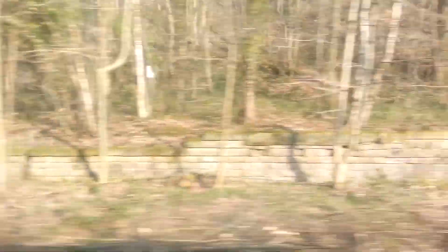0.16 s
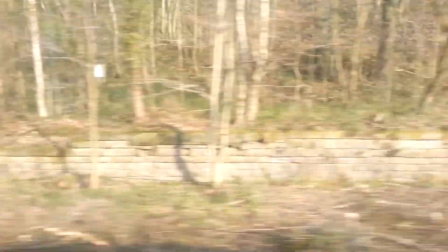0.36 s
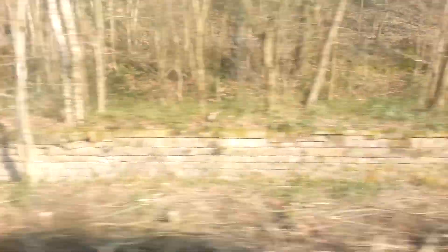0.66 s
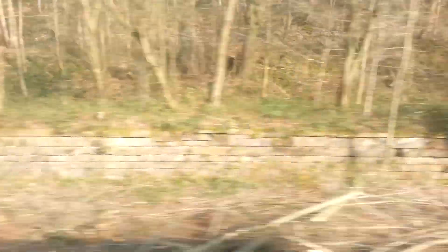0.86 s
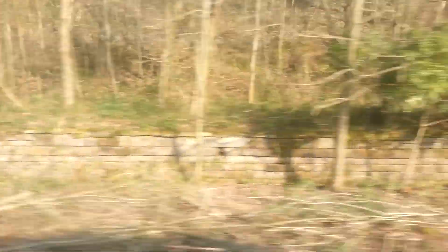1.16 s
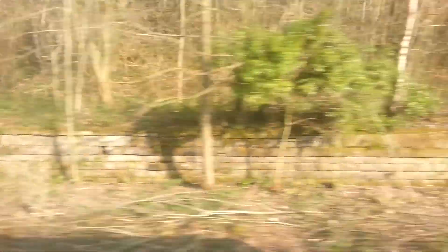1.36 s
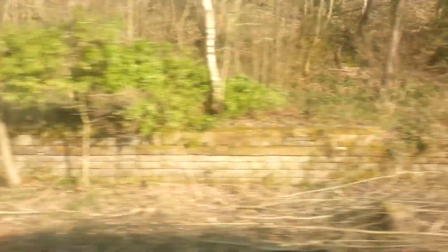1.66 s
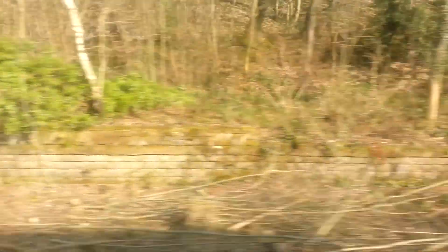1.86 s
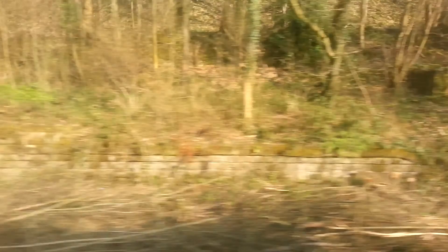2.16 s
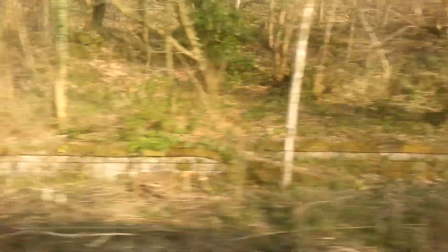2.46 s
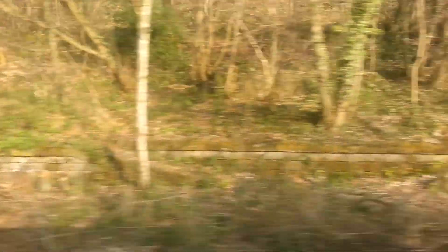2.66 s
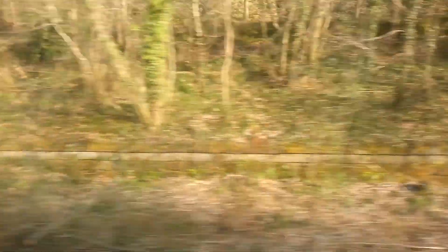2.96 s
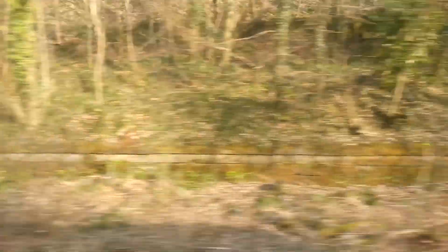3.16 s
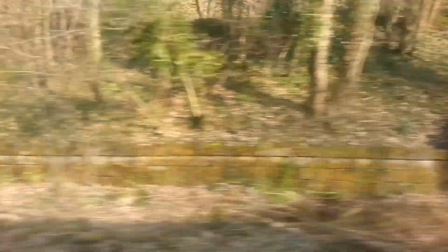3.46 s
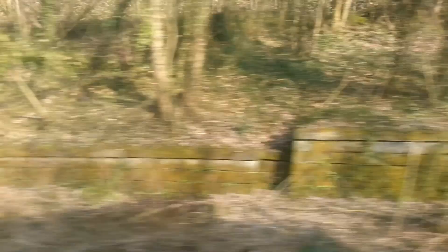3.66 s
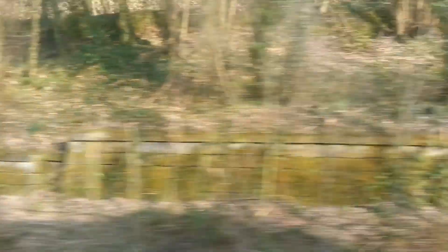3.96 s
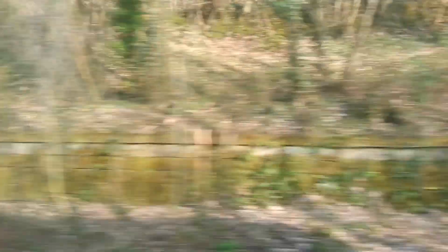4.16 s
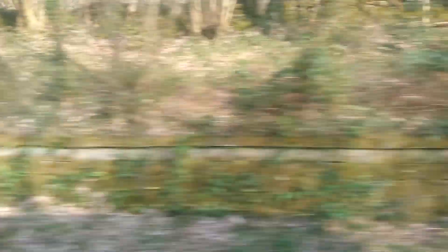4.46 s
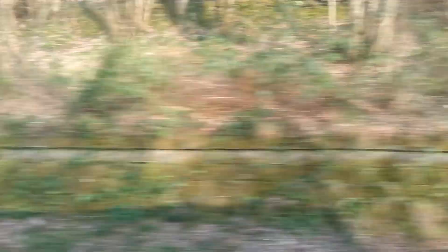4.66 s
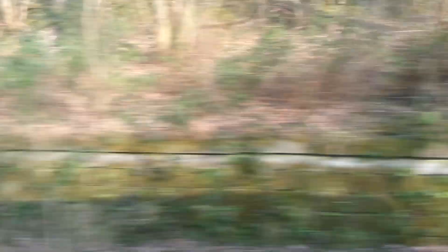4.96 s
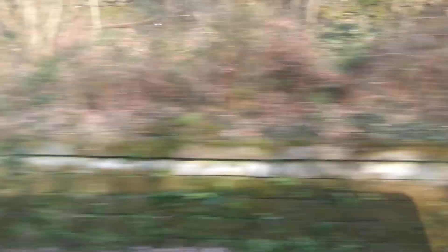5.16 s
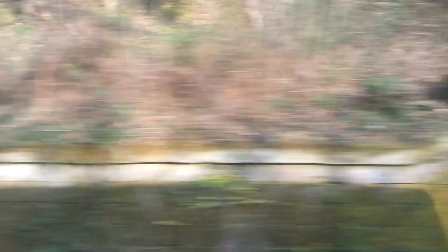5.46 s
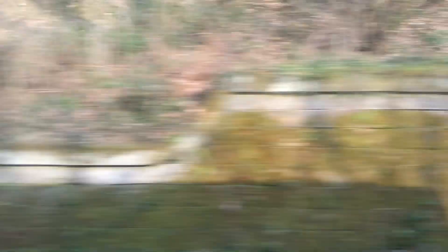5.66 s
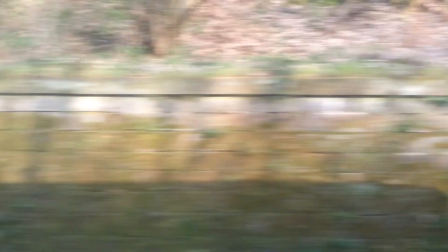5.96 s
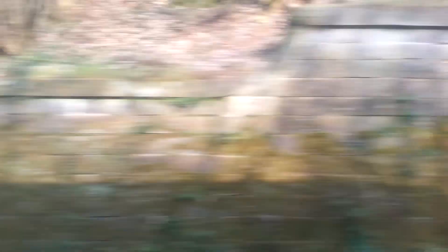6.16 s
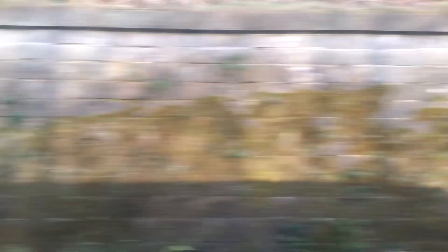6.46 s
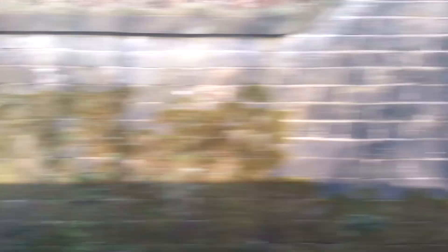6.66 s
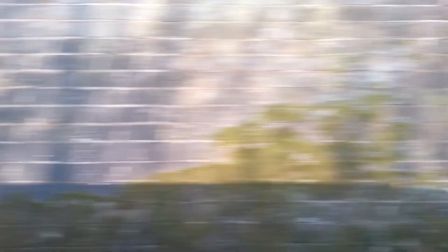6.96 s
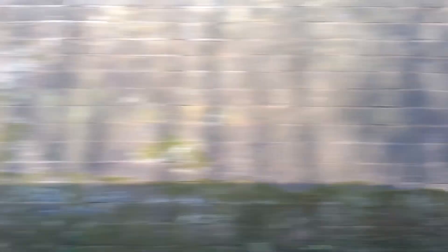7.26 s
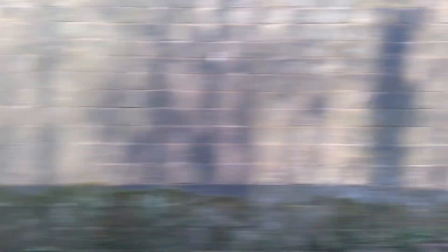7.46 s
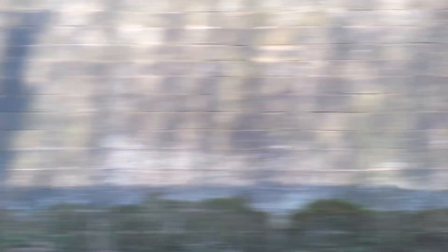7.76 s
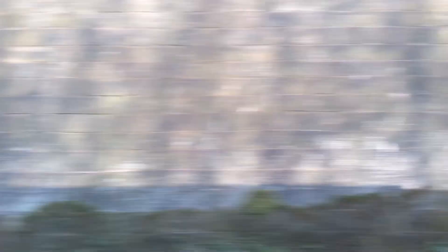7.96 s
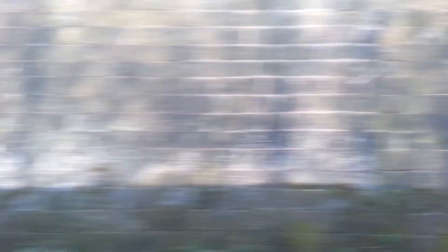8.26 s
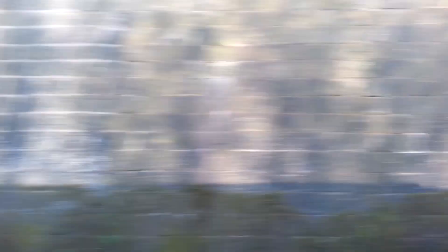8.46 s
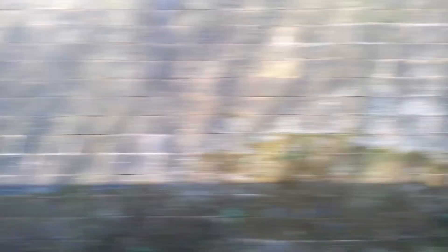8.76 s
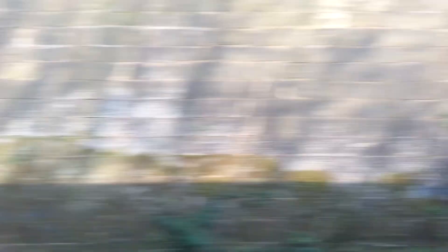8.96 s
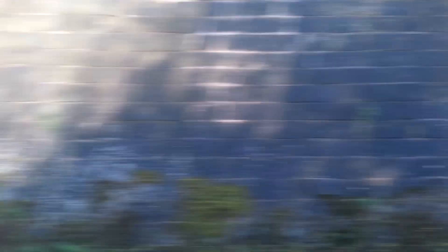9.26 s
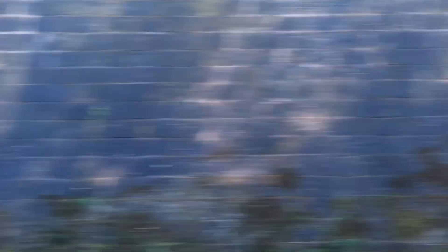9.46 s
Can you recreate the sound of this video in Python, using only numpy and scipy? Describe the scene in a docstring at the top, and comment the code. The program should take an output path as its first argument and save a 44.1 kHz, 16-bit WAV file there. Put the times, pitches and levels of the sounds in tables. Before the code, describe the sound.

Heard from a window seat inside a speeding diesel passenger carriage, an unbroken wheel roar fills the whole ten seconds, dull and mid-heavy, with low boom, airy rush and uneven judder. A heavy clack lands at the very start. Soft bumps and short panel drumming follow, and a sharp dry tick snaps on the right at 1.2 seconds. Double clacks, about 0.15 seconds apart, hit at 2.0, 4.1 and 6.3, then faster at 7.4 and 8.5, with a last single knock at 9.5. Each has a steel crack, floor thud and brief ringing; the loudest distort slightly. Hissing swells follow the joints and also rise around 0.8, 2.9 and 5.1. Thin, high flange squeals with scraping appear near 4.4 to 4.8, faintly at 6.5, then more often from 7.5 to 9.3. Around 8.5 the panels drum most strongly, with a hollow boom. The roar continues to the end.

```python
"""Wheels roar on steel rails, heard at the window seat inside a diesel passenger train.
Coloured noise, filtered by the carriage body, rumbles and hisses louder over worn rail and in dips.
Two axles of a bogie clack over each joint, the loudest overloading the microphones: bursts of noise and ringing modes.
Panels drum and wheels and rails sing as roughened tones; brief dull noise bursts make chance lumps in the roar.
A fitting ticks as short damped cycles on the right; a rubbing flange squeals as gliding tones with scrape."""
import sys
import numpy as np
from scipy import signal
from scipy.fft import rfft, irfft, next_fast_len
from scipy.io import wavfile

SR = 44100
rng = np.random.default_rng(int(sys.argv[2]) if len(sys.argv) > 2 else 0)


def to_wav(s):
    """Save 16-bit WAV."""
    ch = np.atleast_2d(s).T  # columns
    pcm = np.round(np.clip(ch, -1, 1) * 32767)  # PCM
    wavfile.write(sys.argv[1], SR, pcm.astype(np.int16))


N = 424241


def amp(db):
    """Decibels to gain."""
    return 10 ** (np.asarray(db) / 20)


def evened(x):
    """Scales to rms 1."""
    return x / np.sqrt(np.mean(x ** 2) + 1e-20)


def read(points, hz):
    """Reads a table along a log-frequency axis."""
    f, value = np.transpose(points)
    return np.interp(np.log(hz + 1), np.log(f + 1), value)


def follow(rows, axis):
    """One column of a time curve, sample by sample."""
    rows = np.array(rows)
    return np.interp(np.arange(N) / SR, rows[:, 0], rows[:, axis])


def add(mix, s, sound):
    """Adds a stereo sound at a time in seconds, trimmed to fit the mix."""
    start = round(s * SR)
    sound = sound[:, max(-start, 0):]
    part = mix[:, max(start, 0):][:, :sound.shape[1]]
    part += sound[:, :part.shape[1]]


def wander(hz, size):
    """Slow random curve, rms 1 over the whole scene, moving up to about hz."""
    f = np.fft.rfftfreq(N, 1 / SR)
    noise = rfft(rng.standard_normal(N))
    return evened(irfft(noise / (1 + (f / hz) ** 4), N))[:size]


def fuzz(width, size):
    """Stereo complex noise of rms 1 that spreads a tone over width Hz."""
    # the extra half second lets the filter settle
    a, b = rng.standard_normal((2, 2, size + SR // 2))
    lowpass = signal.butter(2, width / 2, fs=SR, output="sos")
    z = signal.sosfilt(lowpass, a + 1j * b)[:, -size:]
    return z / np.sqrt(np.mean(abs(z) ** 2))


def jitter(hz, size):
    """Quick random curve of rms 1, moving up to about hz, for one short sound."""
    return evened(fuzz(2 * hz, size=size)[0].real)


SKIRT_DB_PER_OCTAVE = 15


def colour_db(spectrum, hz):
    """Reads a spectrum, falling away beyond its ends."""
    inside = np.clip(hz, spectrum[0][0], spectrum[-1][0])
    octaves_out = abs(np.log2((hz + 1) / (inside + 1)))
    return read(spectrum, hz) - SKIRT_DB_PER_OCTAVE * octaves_out


# level difference of the two microphones: [f/Hz, left minus right/dB]
MIC_BALANCE = [(40, -3.5), (120, -1.5), (300, -1.7), (440, -2.3), (620, 0), (850, .5), (1200, -2.8),
               (1700, 0), (3300, 1), (8000, -1)]
# phase difference of the two microphones: [f/Hz, left lead/rad]
MIC_LEAD = [(20, 0), (300, .05), (430, .2), (690, .6), (1030, .65), (2070, 3.9), (3190, 7.2), (4740, 10.7),
            (6500, 14.8), (9000, 20.5)]


def ports(hz, wave):
    """A complex tone as the two microphones hear it, apart in level and phase."""
    side = amp(read(MIC_BALANCE, hz) / 2)
    right = wave / side * np.exp(-1j * read(MIC_LEAD, hz))
    return np.array([wave * side, right]).real


# coherence of the two microphones: [f/Hz, likeness 0-1]
MIC_LIKENESS = [(30, .6), (80, .83), (160, .92), (320, .82), (450, .7), (700, .66), (1100, .45), (1700, .3),
                (3300, .42), (8000, .3)]
# resonances of floor, walls and wheels: [f/Hz, width/Hz, lift/dB]
BODY_RESONANCES = [(77.4, 5.1, 0.5), (156, 51, 3.5), (199.4, 47, -2), (263, 56, 7.5), (309, 37, -4.5),
                   (345, 12, 1.5), (530, 43, 3), (590, 16, 4), (640.6, 11, 4.5), (663, 44, -1.5),
                   (741.6, 29, 5.5), (958, 26, 0.5), (1094, 49, 3.5), (1151, 140, -3.5), (1218, 61, 4.5),
                   (1341, 58, 4.5), (2320, 75, 3.5), (2655, 100, -2.5), (2860, 350, 3), (3656, 230, 6),
                   (4350, 440, 2.5), (4540, 35, 5)]


def cabin(spectrum, size):
    """Noise of one colour radiated by the carriage body to two microphones; their mean has rms 1."""
    fft_size = next_fast_len(size)
    hz = np.fft.rfftfreq(fft_size, 1 / SR)
    a, b, c, d = rng.standard_normal((4, len(hz)))
    same = np.clip(read(MIC_LIKENESS, hz), 0, 1)
    left = a + 1j * b
    right = same * left + np.sqrt(1 - same ** 2) * (c + 1j * d)
    right = right * np.exp(-1j * read(MIC_LEAD, hz))
    body_db = sum(db / (1 + (2 * (hz - f) / width) ** 2) for f, width, db in BODY_RESONANCES)
    side = amp(read(MIC_BALANCE, hz) / 2)
    shaped = np.array([left * side, right / side]) * amp(colour_db(spectrum, hz) + body_db)
    pair = irfft(shaped, fft_size)[:, :size]
    return pair / np.std(pair.mean(0))


def swell(start, length, attack, t60, sag_db=0):
    """Power of a passing swell: it builds, holds or sags (dB per s) for its length, and dies away."""
    t = np.maximum(np.arange(N) / SR - start, 0)
    fall_db = sag_db * np.minimum(t, length) - 60 * np.maximum(t - length, 0) / t60
    return np.minimum(t / attack, 1) ** 2 * amp(np.maximum(fall_db, -100)) ** 2


# slow changes of the track, before trims: [t/s, roar level/dB, level of wheel rush at the window/dB]
TRACK_LEVELS = [(0.0, -20, -36.5), (.7, -19, -37.5), (1.45, -21.5, -38), (2.0, -20, -37.5),
                (2.8, -21, -37.5), (3.55, -19, -34.5), (3.98, -21, -38), (4.4, -19, -36.5),
                (5.0, -20.5, -37.5), (5.6, -20, -34.5), (5.95, -18, -33), (6.25, -19.5, -34.5),
                (6.9, -17, -33.5), (7.2, -22, -35), (8.1, -19.5, -33), (8.92, -21, -34.5), (9.22, -19, -35),
                (9.4, -19.5, -34.5)]
# worn railhead, before trims:
# [t/s, attack/s, length/s, hiss level/dB, rush level/dB, rumble level/dB, heave level/dB]
WORN_RAIL = [(0.0, 0.023, 0.11, -49, -33, -21, -58), (0.78, 0.1, 0.37, -37, -32.5, -24.5, -44),
             (1.985, 0.025, 0.26, -41, -31, -22, -54), (2.903, 0.17, 0.37, -38, -35, -29, -40.5),
             (4.11, 0.016, 0.25, -43, -29.5, -25.5, -63), (5.066, 0.037, 0.38, -35, -35.5, -20, -48),
             (6.29, 0.02, 0.28, -48, -30.5, -28, -55), (7.22, 0.047, 0.39, -34.5, -27, -19.5, -51),
             (8.277, 0.074, 0.4, -34.5, -30, -17.5, -49), (9.393, 0.021, 0.28, -37.5, -28, -19.5, -52)]
# soft bumps as a wheel rides through a dip, before trims: [t/s, length/s, roar level/dB, boom level/dB]
RAIL_DIPS = [(0.65, 0.04, -23.5, -39), (0.84, 0.075, -21, -26), (1.096, 0.03, -24, -23),
             (1.866, 0.045, -20.5, -21), (2.598, 0.04, -22.5, -25), (2.93, 0.076, -23, -24.5),
             (3.068, 0.054, -18, -21), (3.209, 0.063, -23, -20.5), (3.41, 0.043, -19.5, -29),
             (3.524, 0.11, -19.5, -28.5), (4.435, 0.024, -23, -28), (4.626, 0.019, -20, -28),
             (4.865, 0.051, -20.5, -40), (5.056, 0.11, -16.5, -36), (5.236, 0.069, -20.5, -29),
             (5.775, 0.058, -21, -21), (6.86, 0.22, -23, -32), (7.04, .04, -20, -34),
             (7.238, 0.062, -15, -28), (7.716, 0.036, -20.5, -36), (7.986, 0.035, -20.5, -29),
             (8.29, 0.18, -18, -34), (8.51, 0.16, -25, -26), (8.792, 0.031, -22, -24),
             (9.025, 0.12, -21, -26.5), (9.146, 0.095, -17, -33), (9.394, 0.063, -16.5, -30)]
# relative colours of the layers, each: [f/Hz, density/dB per Hz]
# mid-range roar of the wheels
ROAR_COLOUR = [(120, -36), (250, -13.5), (380, -9), (580, -0.5), (800, -2), (1020, -3.5), (1200, -10.5),
               (1500, -18), (2200, -25.5), (5000, -50)]
# low boom of the carriage
BOOM_COLOUR = [(20, -32.5), (50, -30), (70, -19), (105, -17.5), (150, -7), (200, -3), (260, -2.5),
               (340, 4.5), (500, 1.5), (1200, -75)]
# heaving of the suspension
HEAVE_COLOUR = [(18, -14.5), (35, -7), (55, -10), (80, 0.5), (115, -3), (170, -18), (400, -50)]
# rush of the wheels coming in at the window
RUSH_COLOUR = [(500, -35), (1100, -14.5), (1500, 5), (2000, 3), (2700, -3.5), (3300, -5), (3750, -6.5),
               (4100, -10.5), (4600, -9.5), (5300, -17.5), (7000, -26.5), (10000, -60.5)]
# broad hiss of wheel on rail
HISS_COLOUR = [(20, -5), (60, 7), (110, 10), (400, 4.5), (2000, 20.5), (3600, 11), (4700, 14), (5700, 4),
               (7000, 9.5), (8200, 3), (9200, -6), (10500, -16), (14000, -37), (17000, -45)]
BOOM_RE_ROAR_DB, HISS_RE_RUSH_DB = -7.5, -10.5
HEAVE_DB = -52  # on smooth rail
WORN_SAG_DB_PER_S, WORN_T60_S = -10, 1
BUMP_RISE_S, BUMP_FADE_T60_S = 0.014, 0.33
BUMP_RUSH_DB = -14.5  # relative to the roar of a bump


def rolling(roar_db=0.13, boom_db=-0.3, rush_db=-1, hiss_db=0.5, judder_db=0.8, judder_hz=30, grit_db=2.0, grit_hz=70):
    """Wheels on steel, louder on worn rail and in dips; contact force judders, shaking heavy parts most."""
    # layers gather as power, since independent noises add that way
    track_db = follow(TRACK_LEVELS, axis=1)
    window_db = follow(TRACK_LEVELS, axis=2)
    roar = amp(track_db) ** 2
    boom = amp(track_db + BOOM_RE_ROAR_DB) ** 2
    rush = amp(window_db) ** 2
    hiss = amp(window_db + HISS_RE_RUSH_DB) ** 2
    heave = amp(HEAVE_DB) ** 2
    grit = amp(grit_db * wander(grit_hz, size=N)) ** 2
    for s, attack, length, worn_hiss_db, worn_rush_db, rumble_db, heave_db in WORN_RAIL:
        power = grit * swell(s, length, attack, WORN_T60_S, WORN_SAG_DB_PER_S)
        hiss = hiss + power * amp(worn_hiss_db) ** 2
        rush = rush + power * amp(worn_rush_db) ** 2
        boom = boom + power * amp(rumble_db) ** 2
        heave = heave + power * amp(heave_db) ** 2
    for s, length, bump_roar_db, bump_boom_db in RAIL_DIPS:
        power = swell(s, length, BUMP_RISE_S, BUMP_FADE_T60_S)
        roar = roar + power * amp(bump_roar_db) ** 2
        boom = boom + power * amp(bump_boom_db) ** 2
        rush = rush + power * amp(bump_roar_db + BUMP_RUSH_DB) ** 2
    judder = judder_db * wander(judder_hz, size=N)
    return (cabin(ROAR_COLOUR, size=N) * np.sqrt(roar) * amp(roar_db + judder)
            + cabin(BOOM_COLOUR, size=N) * np.sqrt(boom) * amp(boom_db + judder)
            + cabin(HEAVE_COLOUR, size=N) * np.sqrt(heave) * amp(judder)
            + cabin(RUSH_COLOUR, size=N) * np.sqrt(rush) * amp(rush_db + judder / 2)
            + cabin(HISS_COLOUR, size=N) * np.sqrt(hiss) * amp(hiss_db + judder / 2))


# faint steel modes of wheels and rails: [f/Hz, width/Hz, level re window column of TRACK_LEVELS/dB]
STEEL_MODES = [(2290, 70, -12), (2890, 110, -12), (3760, 80, -11.5)]
RAIL_SWELL_HZ, RAIL_SWELL_DB = 9, 2.5
RAIL_DRIFT = .008  # rms share of the pitch


def rails():
    """Rolling keeps a few steel modes singing; each swells and drifts in pitch on its own."""
    out = np.zeros((2, N))
    window_db = follow(TRACK_LEVELS, axis=2)
    for hz, width, db in STEEL_MODES:
        pitch = hz * (1 + RAIL_DRIFT * wander(RAIL_SWELL_HZ, size=N))
        turns = np.cumsum(pitch) / SR
        level = amp(db + window_db + RAIL_SWELL_DB * wander(RAIL_SWELL_HZ, size=N))
        out += level * (fuzz(width, size=N) * np.exp(2j * np.pi * turns)).real
    return out


BOUNCE_SAG_DB = -2.5  # while a burst is held


def blow(colour, rise, hold, t60, rattle_db=0, rattle_hz=130):
    """A noise burst rings up, sags and may rattle, then dies; its energy follows from its envelope."""
    t = np.arange(SR // 2) / SR
    fall_db = BOUNCE_SAG_DB * np.minimum(t / hold, 1) - 60 * np.maximum(t - hold, 0) / t60
    envelope = (1 - np.exp(-t / rise)) * amp(fall_db)
    ring = cabin(colour, size=len(t)) * envelope * amp(rattle_db * jitter(rattle_hz, size=len(t)))
    return ring * np.linalg.norm(envelope) / np.linalg.norm(ring.mean(0))


# bogie modes a joint sets ringing, before chime trim and spread: [f/Hz, level re knock/dB, t60/s]
BOGIE_RINGS = [(341, -17, 0.3), (396, -12, 0.28), (604, -8.5, 0.43), (648, -4.5, 0.3), (748, -14, 0.27),
               (982, -2.5, 0.093), (1373, -9.5, 0.21), (1450, -22, .12), (2225, -28, 0.19)]
FLOOR_RING_DB, FLOOR_RING_T60_S = -8.5, 0.29


def chime(floor_hz, rise=0.0008, spread_db=2):
    """The modes of bogie and floor ring on after a blow, in a slightly different mix each time."""
    t = np.arange(SR // 2) / SR
    out = np.zeros((2, len(t)))
    for hz, db, t60 in [(floor_hz, FLOOR_RING_DB, FLOOR_RING_T60_S)] + BOGIE_RINGS:
        phasor = np.exp(2j * np.pi * (hz * t + rng.random()))
        wave = phasor * amp(db + spread_db * rng.standard_normal() - 60 * t / t60)
        out += ports(hz, wave)
    return out * (1 - np.exp(-t / rise))


# relative colours of a clack, each: [f/Hz, density/dB per Hz]
# knock in the bogie
KNOCK_COLOUR = [(60, -62), (200, -30), (350, -14), (600, -4.5), (1000, 0.5), (1200, -8.5), (1500, -9.5),
                (2200, -22.5), (4000, -26), (9000, -65)]
# thud through the floor, for a floor ringing at FLOOR_HZ
THUD_COLOUR = [(60, -39), (110, -32), (150, -7.5), (195, -4.5), (232, 5), (265, 4.5), (340, 5.5), (500, 3),
               (1200, -75)]
# crack of steel
CRACK_COLOUR = [(600, -1), (1400, 4.5), (2000, 0.5), (2800, -8), (3700, -1), (4600, -5.5), (5600, -14),
                (8000, -17.5), (9500, -27), (14000, -52), (17000, -71)]
# first contact of wheel and rail end
SNAP_COLOUR = [(700, 1), (1300, 4.5), (2300, 0.5), (3800, -12), (5500, -36), (9000, -43), (14000, -57)]
# jolt of the suspension
JOLT_COLOUR = [(15, -14), (50, -20), (90, 10), (150, -16), (400, -41)]
FLOOR_HZ = 250
SNAP_DB = 4  # above the crack
CHIME_DB = 2.5
RATTLE_DB = 3  # rms shake of the steel


def clack(bounce_s, bogie_db, floor_db, steel_db, jolt_db, floor_hz):
    """An axle drops into the gap: steel snaps and cracks, bogie rings, floor thuds, suspension jolts."""
    floor = [(hz * floor_hz / FLOOR_HZ, db) for hz, db in THUD_COLOUR]
    knock = amp(-0.5) * blow(KNOCK_COLOUR, rise=0.0017, hold=bounce_s, t60=0.22)
    knock = amp(bogie_db) * (knock + amp(CHIME_DB) * chime(floor_hz))
    thud = amp(floor_db - 0.6) * blow(floor, rise=0.0036, hold=bounce_s, t60=0.21)
    crack = blow(CRACK_COLOUR, rise=0.0013, hold=bounce_s / 2, t60=0.41, rattle_db=RATTLE_DB)
    snap = blow(SNAP_COLOUR, rise=.0006, hold=.005, t60=.035, rattle_db=RATTLE_DB)
    steel = amp(steel_db) * crack + amp(steel_db + SNAP_DB) * snap
    jolt = amp(jolt_db) * blow(JOLT_COLOUR, rise=.003, hold=0.0075, t60=0.042)
    return knock + thud + steel + jolt


# axles crossing joints, two to a bogie, before trims: [t/s, bouncing/s, knock level/dB,
# thud level/dB, crack level/dB, suspension jolt level/dB, floor f/Hz]
AXLE_LANDINGS = [(.027, 0.019, -7.5, -7.5, -21, -34, 249), (1.998, 0.024, -9, -8, -18.5, -50, 248),
                 (2.146, 0.0076, -8, -3.5, -24.5, -33, 252), (4.131, 0.05, -10, -15, -20.5, -58, 245),
                 (4.281, 0.021, -4.5, -11.5, -22.5, -53, 248), (6.284, 0.037, -9, -18, -21, -42, 251.5),
                 (6.434, 0.02, -4, -8, -19, -34, 251), (7.365, .03, -8, -9.5, -19.5, -29, 255),
                 (7.514, 0.016, -4.5, -9.5, -29, -32, 257), (8.453, 0.025, -7.5, -4, -23, -27, 313),
                 (8.601, 0.016, -6.5, -4.5, -35, -33, 321), (9.536, 0.018, -8.5, -20, -19.5, -33, 305)]


def joints():
    """Both axles cross each joint in turn; the second mostly lands harder and duller."""
    out = np.zeros((2, N))
    for s, *landing in AXLE_LANDINGS:
        add(out, s, clack(*landing))
    return out


# panels drumming briefly: [t at its height/s, f/Hz, peak level before roughness/dB]
PANEL_DRUMMING = [(.107, 266, -14), (.459, 587, -18), (.711, 540, -12), (0.986, 530, -15), (1.1, 513, -21),
                  (1.099, 275, -16), (2.955, 546, -19), (3.088, 590, -21), (3.445, 607, -17),
                  (3.561, 530, -19), (3.602, 660, -14), (5.953, 710, -15.5), (6.535, 350, -15),
                  (6.792, 535, -12.5), (7.25, 555, -13), (8.342, 395, -21), (8.374, 576, -19),
                  (8.4, 740, -16), (8.527, 527, -16), (8.49, 326, -4.5), (8.585, 380, -10.5),
                  (8.626, 262, -6), (8.678, 424, -10.5), (8.809, 567, -13.5), (9.044, 580, -12),
                  (9.169, 622, -10), (9.419, 580, -18)]


def panels(build_s=0.015, fade_s=0.016, rough=0.22, rough_hz=110):
    """A wall or floor panel drums up at its own pitch for a moment and dies down."""
    out = np.zeros((2, N))
    t = np.arange(-SR // 10, SR // 5) / SR
    envelope = np.exp(-(t / np.where(t < 0, build_s, fade_s)) ** 2)
    for s, hz, db in PANEL_DRUMMING:
        tone = np.exp(2j * np.pi * (hz * t + rng.random()))
        wave = tone * (1 + rough * fuzz(rough_hz, size=len(t))[0])
        add(out, s + t[0], amp(db) * envelope * ports(hz, wave))
    return out


# chance lumps in the rolling roar: [t/s, level/dB]
ROAR_LUMPS = [(.35, -10.5), (.404, -13), (.577, -12), (1.089, -11), (1.512, -15), (2.589, -12), (3.08, -11),
              (5.103, -10), (5.311, -11), (5.909, -12), (5.947, -13)]
# their relative colour: [f/Hz, density/dB per Hz]
LUMP_COLOUR = [(100, -40), (200, -14), (350, -4), (600, 0), (900, -2), (1300, -16), (2500, -36),
               (5000, -62)]


def lumps():
    """Brief dull noise bursts stand out as chance lumps in the rolling roar."""
    out = np.zeros((2, N))
    for s, db in ROAR_LUMPS:
        add(out, s, amp(db) * blow(LUMP_COLOUR, rise=.0007, hold=.006, t60=.04))
    return out


# ticks of a loose fitting beside the right microphone: [t/s, level at right/dB]
FITTING_TICKS = [(1.224, -12), (1.2265, -1.5)]
# its heavily damped modes: [f/Hz, level/dB, half length/s]
FITTING_MODES = [(1450, 0, .00036), (4500, -12, .00025)]
TICK_LEFT_DB = -18  # relative to the right


def tick():
    """A loose fitting close by touches, then snaps home: one dry cycle with a bright edge."""
    out = np.zeros((2, N))
    t = np.arange(-SR // 500, SR // 500) / SR
    snap = np.zeros(len(t))
    for hz, db, width in FITTING_MODES:
        snap -= np.sin(2 * np.pi * hz * t) * amp(db) * np.exp(-(t / width) ** 2)
    for s, db in FITTING_TICKS:
        add(out, s + t[0], amp([[db + TICK_LEFT_DB], [db]]) * snap)
    return out


# a flange rubbing the rail, before roughness:
# [t/s, length/s, start f/Hz, end f/Hz, tone level/dB, scrape level/dB]
FLANGE_SQUEALS = [(4.373, .07, 4420, 4350, -47, -42), (4.408, 0.13, 3660, 3600, -35, -32),
                  (4.44, .29, 3600, 3670, -43, -41), (4.71, 0.17, 2570, 2570, -39, -47),
                  (6.491, 0.26, 3500, 3530, -48, -34), (7.532, .12, 3690, 3640, -41, -30),
                  (7.909, .12, 3660, 3610, -31, -35), (7.96, 0.15, 3490, 3540, -38, -35),
                  (8.62, 0.072, 3720, 3720, -33, -36), (8.67, 0.18, 3640, 3540, -46, -38),
                  (8.782, .19, 3610, 3590, -45, -36.5), (9.015, .12, 3640, 3690, -33, -30),
                  (9.036, .21, 3610, 3640, -46, -34), (9.077, .15, 3760, 3730, -34.5, -41),
                  (9.159, 0.18, 3770, 3800, -43, -40), (8.68, .08, 10100, 10020, -58, -55),
                  (8.677, .12, 5130, 5220, -52, -45)]
SLIP_HZ, SLIP_DB, SLIP_BEND_HZ = 45, 2.5, 18  # grip and slip: rate, rms shake of level and of pitch
RASP, RASP_HZ = .6, 140  # roughness of the tone: share, width


def flange(rise=0.2, scrape_hz=330):
    """Rubbing catches wheel modes: gliding tones that grip and slip inside a band of scraping."""
    out = np.zeros((2, N))
    for s, length, from_hz, to_hz, tone_db, scrape_db in FLANGE_SQUEALS:
        t = np.arange(round(length * SR)) / SR
        glide = from_hz + (to_hz - from_hz) * t / length
        hz = glide + SLIP_BEND_HZ * jitter(SLIP_HZ, size=len(t))
        grip = evened(amp(SLIP_DB * jitter(SLIP_HZ, size=len(t))))
        # each side starts at its own phase within a quarter turn
        tone = grip * np.exp(2j * np.pi * rng.random((2, 1)) / 4) + RASP * fuzz(RASP_HZ, size=len(t))
        rub = amp(tone_db) * tone + amp(scrape_db) * fuzz(scrape_hz, size=len(t))
        ring = np.sqrt(2) * (rub * np.exp(2j * np.pi * np.cumsum(hz) / SR)).real
        add(out, s, ring * np.interp(t / length, [0, rise, .6, 1], [0, 0.99, 0.94, 0.16]))
    return out


def scene():
    """Everything heard at the window seat."""
    return rolling() + rails() + joints() + panels() + lumps() + tick() + flange()


EDGE_HZ = 15300


def record(dry):
    """The loudest peaks clip at full scale; then a lowpass limits the band."""
    clipped = np.clip(dry, -1, 1)
    lowpass = signal.firwin(255, EDGE_HZ, window=("kaiser", 8), fs=SR)
    return signal.oaconvolve(clipped, lowpass[None], "same", axes=1)


dry = scene()
out = record(dry)
to_wav(out)
```